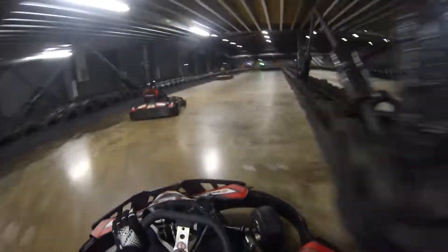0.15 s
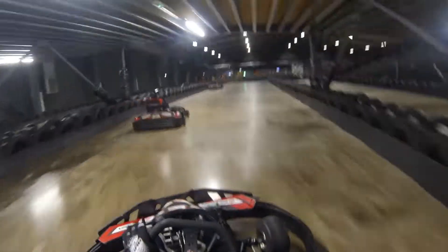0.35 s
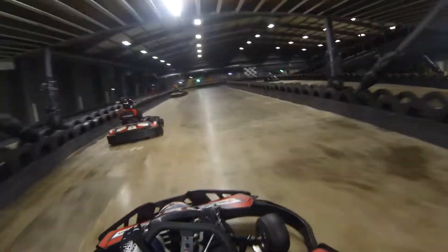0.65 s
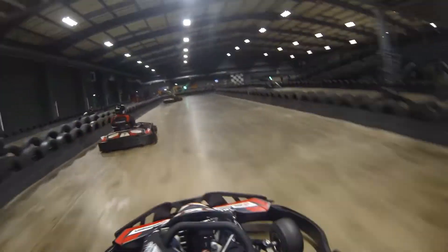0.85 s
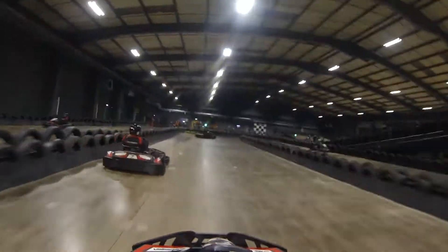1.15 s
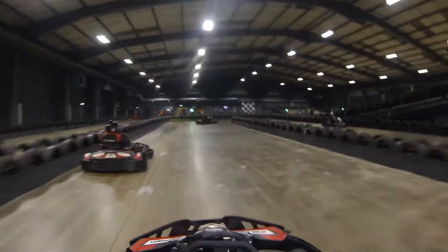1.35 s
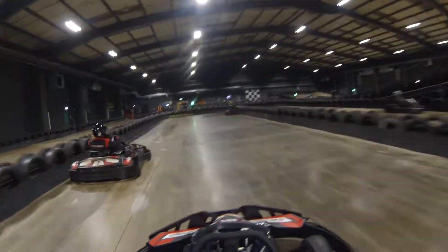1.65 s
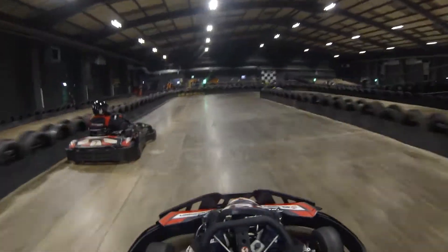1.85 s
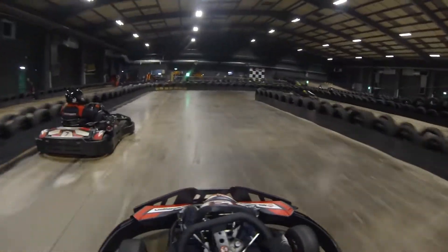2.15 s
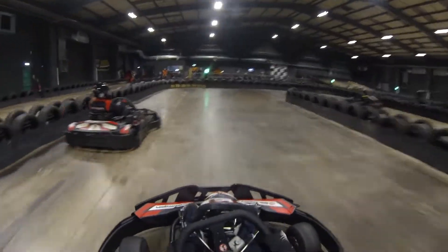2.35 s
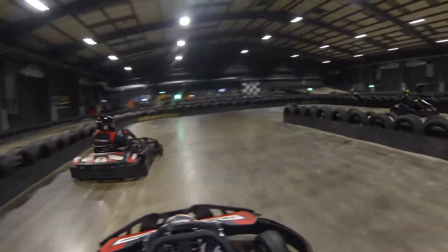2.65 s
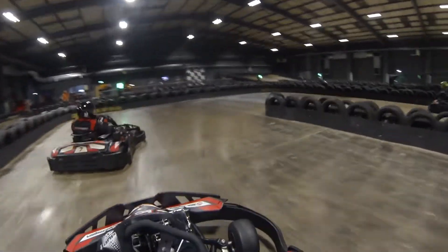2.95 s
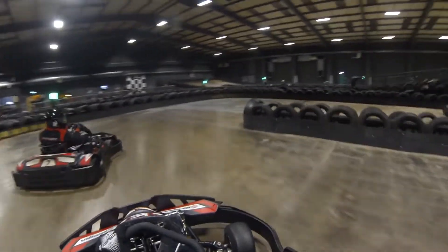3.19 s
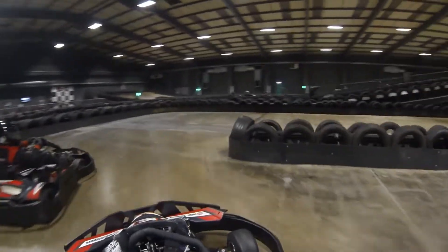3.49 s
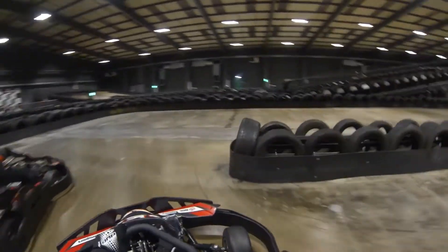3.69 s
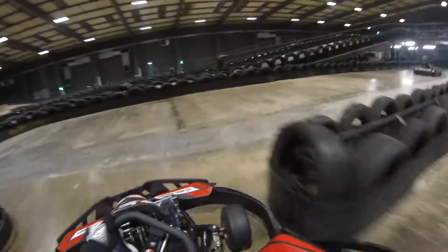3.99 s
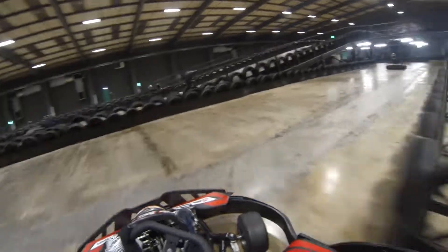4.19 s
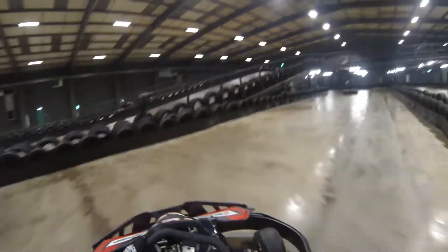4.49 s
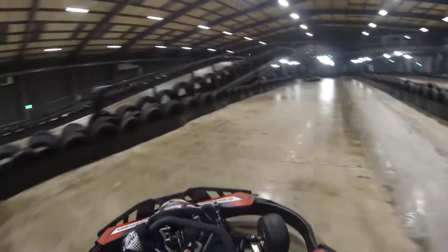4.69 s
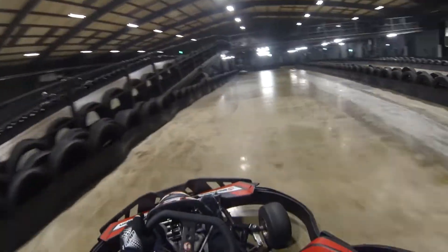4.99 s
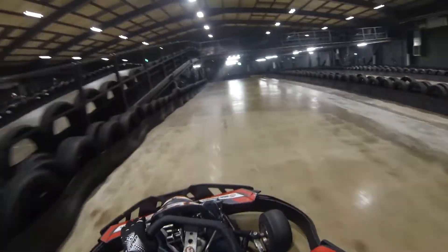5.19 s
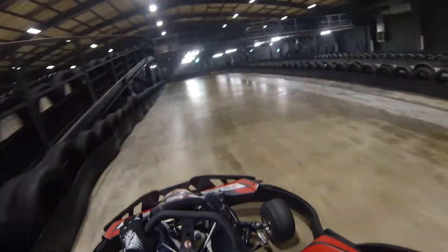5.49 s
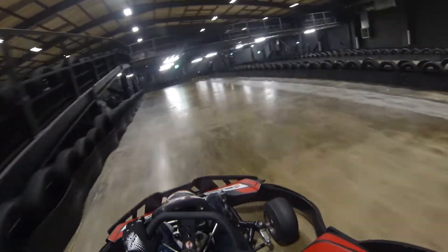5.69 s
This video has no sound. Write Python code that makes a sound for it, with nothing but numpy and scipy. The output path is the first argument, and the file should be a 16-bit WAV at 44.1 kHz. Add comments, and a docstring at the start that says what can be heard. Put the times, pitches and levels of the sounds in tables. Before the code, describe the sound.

A go-kart engine drones and throbs over a roaring hall, cuts with a thump, coasts, then pulls away amid frantic plasticky squeaks.

```python
"""A go-kart in an indoor hall; the microphone is in a sealed camera housing on the driver's helmet.
First the single-cylinder engine pulls, pulse by pulse, over noise for the roar of tyres and engines; a kart
passes alongside as faint wavering tones, and a loose plastic joint near the microphone squeaks by stick-slip.
The throttle shuts with a rasp, a decaying low swing thumps, and the kart coasts over a shuddering floor.
Then the throttle opens again, and the joint squeaks in quick succession as the kart pulls out of the bend."""
import sys
import numpy as np
from scipy import signal
from scipy.fft import rfft, irfft, next_fast_len
from scipy.io import wavfile
from scipy.ndimage import uniform_filter1d, map_coordinates

SR = 44100
rng = np.random.default_rng(int(sys.argv[2]) if len(sys.argv) > 2 else 0)


def file_out(sig):
    """Save sig as 16-bit WAV at sys.argv[1]."""
    # one column per channel
    cols = np.atleast_2d(sig).T
    # limit, then scale
    lim = np.clip(cols, -1, 1)
    pcm = np.round(lim * 32767).astype(np.int16)
    wavfile.write(sys.argv[1], SR, pcm)


def boost_factor(decibels):
    """Convert a level in decibels to a linear amplitude factor."""
    exponent = np.asarray(decibels, float) / 20
    return 10 ** exponent


N = 257544

# Driver's throttle. Each row: time in seconds, opening from 0 to 1.
THROTTLE = [(0, 1), (1.61, 1), (1.67, .35), (3.45, .3), (3.57, .9), (3.7, .8), (3.85, .55), (3.95, .85),
            (4.6, .97), (5.84, 1)]
# Engine speed. Each row: time in seconds, firings per second.
FIRING_RATE = [(0, 32.6), (.27, 32.1), (.68, 33.2), (.97, 32.6), (1.18, 33.4), (1.31, 33.5), (1.48, 34.2),
               (1.6, 34.3), (1.75, 31.9), (1.9, 29.3), (2.23, 25.8), (2.54, 24.5), (3.25, 22.7),
               (3.64, 22.6), (3.89, 21.8), (4.1, 22.8), (4.33, 24.4), (4.66, 24.4), (4.9, 24.6),
               (5.1, 24.6), (5.67, 25.1), (5.84, 25.8)]
# Exhaust path to the microphone. Each row: frequency in Hz, relative gain in dB.
EXHAUST_PATH = [(20, -18), (65, 0), (100, 2.5), (128, 4), (148, 4), (168, -4), (195, -5.5), (220, -0.5),
                (236, -14), (258, -12), (274, -2), (296, -5), (318, 1.5), (336, -1.5), (356, -10),
                (600, -28.5), (2000, -47), (5000, -120)]
# Exhaust drone smeared by the hall and other karts. Each row: frequency in Hz, relative level in dB per Hz.
DRONE_SPECTRUM = [(41, -33), (70, -4.5), (102, -6), (161, -3.5), (175, -8), (200, -0.5), (430, -14),
                  (666, -26), (800, -19), (1040, -48), (1760, -120)]
# Moments when the frame's shake swells (+) or slackens (-). Each row: time in seconds, change in dB.
SHAKE_SURGES = [(.78, -3), (1.0, -0.5), (1.3, -3.5), (1.44, 1), (3.6, 5), (4.5, 13.5)]
# Jolts through the frame. Each row: start in seconds, swing level in dB before a common lift,
# settled pitch in Hz, time to fall 60 dB in seconds, knock level in dB.
JOLTS = [(1.8016, -7.5, 41.8, 0.23, -23.5), (2.535, -18, 39.66, 0.26, -39), (2.944, -17, 41.74, 0.29, -35),
         (4.332, -15.5, 42.15, 0.31, -40)]
# Steady shudder of the frame. Each row: frequency in Hz, relative level in dB per Hz.
SHUDDER_SPECTRUM = [(8, 3), (16, -19.5), (22, 1), (32, -8), (45, -1), (60, -18.5), (90, -20), (200, -52),
                    (500, -120)]
# Rough (+) and smooth (-) patches of floor. Each row: time in seconds, change in dB.
FLOOR_PATCHES = [(1.72, 0), (2.15, 1.5), (2.45, 4.5), (2.6, 3.5), (2.75, -6), (3.15, -7), (3.63, 2),
                 (3.85, -8.5), (4, 4.5), (4.25, -13), (4.45, 3), (5.2, -2.5)]
# Looseness of the fittings, heard as chatter. Each row: time in seconds, level in dB before a common trim.
CHATTER = [(0, -44), (.3, -45.5), (.65, -40), (.84, -41), (.9, -43), (1.45, -48), (1.52, -38), (1.6, -52),
           (3.3, -62.5), (4.55, -47.5), (4.75, -49), (5.3, -43.5), (5.55, -56.5), (5.84, -41)]
# Short squeaky tones. Each row: nominal start in seconds, nominal length in seconds,
# level in dB before a common lift, middle pitch in Hz.
SQUEAKY_TONES = [(0.069, .019, -46, 5420), (0.376, .01, -50, 4610), (0.383, 0.057, -43, 5750),
                 (0.43, .012, -46, 4927), (0.512, 0.019, -44, 5200), (0.54, 0.024, -43, 5470),
                 (0.64, 0.01, -36, 4900), (0.658, 0.02, -33, 5255), (0.694, 0.011, -47, 4685),
                 (0.746, 0.032, -52, 5570), (0.784, 0.02, -49, 5300), (0.815, 0.014, -46, 4720),
                 (0.827, 0.0101, -36.5, 5685), (0.847, .015, -43, 5510), (0.912, 0.0304, -43, 5300),
                 (0.995, .012, -40, 5410), (1.178, .013, -42, 5310), (1.27, 0.012, -39, 5370),
                 (1.501, .01, -42, 4900), (3.452, 0.043, -39, 5600), (3.587, 0.031, -39, 5500),
                 (3.982, .023, -43.5, 6180), (4.106, 0.02, -37, 5176), (4.229, 0.0087, -40.5, 5680),
                 (4.24, .009, -41, 4900), (4.299, 0.018, -37, 5080), (4.317, 0.03, -39, 5940),
                 (4.374, 0.022, -44, 5510), (4.405, 0.047, -37.5, 5130), (4.461, 0.0069, -45, 6300),
                 (4.501, 0.02, -36, 4900)]
# Crowded squeaks out of the bend, rising and falling in level.
# Each row: time in seconds, level in dB before a common lift, pitch in Hz.
CROWDED_SQUEAKS = [(4.6, -62, 5300), (4.63, -44, 6200), (4.638, -50, 5000), (4.648, -37, 5810),
                   (4.675, -49, 5500), (4.69, -34, 4900), (4.702, -44, 5400), (4.714, -35, 5800),
                   (4.73, -42, 5110), (4.744, -57, 5000), (4.756, -40, 4945), (4.77, -40, 4690),
                   (4.782, -41, 5700), (4.8, -40, 5490), (4.812, -36, 4840), (4.836, -35.5, 4790),
                   (4.848, -46, 6000), (4.868, -56, 5630), (4.885, -39, 5000), (4.894, -38, 4340),
                   (4.902, -35, 5650), (4.922, -41, 5590), (4.934, -36, 4450), (4.955, -34, 4900),
                   (4.968, -39, 5970), (4.99, -41, 5850), (5.0, -36, 4860), (5.016, -37, 4800),
                   (5.028, -59, 4900), (5.038, -34, 5810), (5.056, -44, 5110), (5.075, -40, 4900),
                   (5.093, -33.5, 5650), (5.12, -48, 5600), (5.132, -48, 5210), (5.144, -37, 4440),
                   (5.158, -46, 5610), (5.178, -37, 4900), (5.198, -37, 4900), (5.222, -36, 5450),
                   (5.25, -42, 5480), (5.276, -45, 5030), (5.292, -39.5, 4700), (5.318, -31.5, 4800),
                   (5.335, -42, 5520), (5.352, -41, 5000), (5.362, -38, 4850), (5.372, -59, 4700),
                   (5.385, -33.5, 4410), (5.4, -47, 5300), (5.413, -38, 4550), (5.426, -45, 4604),
                   (5.446, -36.5, 4550), (5.468, -46, 5190), (5.486, -34.5, 4360), (5.508, -46, 4510),
                   (5.528, -53, 4705), (5.562, -46, 4300), (5.588, -53, 5800), (5.6, -30.5, 4400),
                   (5.615, -38, 4900), (5.632, -48, 4900), (5.646, -32.5, 4950), (5.662, -46, 4300),
                   (5.677, -31, 4300), (5.688, -34, 4980), (5.704, -58, 4800), (5.718, -26, 4750),
                   (5.73, -40, 4600), (5.752, -44, 4470), (5.764, -30, 4350), (5.782, -39, 4470),
                   (5.802, -29, 4950), (5.814, -39, 5540), (5.826, -36, 5080), (5.84, -30, 5200)]
# Housing resonances near the joint. Each row: frequency in Hz, width in Hz, relative gain in dB.
HOUSING_MODES = [(4232, 127, 3.5), (4900, 214, -0.5), (5620, 316, -1), (9720, 780, 8), (11800, 900, -1)]
# Dry rubbing of the joint. Each row: frequency in Hz, relative level in dB per Hz.
RUBBING_SPECTRUM = [(2500, -78), (4200, 4), (6000, 7), (7200, -2), (8600, -13), (10000, -22), (12300, -7.5),
                    (13500, -18), (14800, -26), (16000, -90)]
# Rasp as the throttle shuts: start in seconds, level of its lowest tone in dB, pitch in Hz.
TICK = (1.6497, -27, 3200)
# Panel resonances. Each row: frequency in Hz, width in Hz, relative gain in dB.
PANEL_MODES = [(1837, 44, 4.5), (2690, 64, -3.5), (3200, 140, -9.5)]
# Swells of the panel buzz. Each row: time in seconds, rise in dB.
BUZZ_SWELLS = [(.5, 5.3), (1.55, 3.2)]
# Short tonal pings of a panel. Each row: start in seconds, peak level in dB, pitch in Hz.
PINGS = [(.425, -36, 3130), (0.441, -31, 2650), (.518, -32, 2770), (.536, -27, 3070), (.575, -26, 3130)]
# Roar of the hall round the kart. Each row: time in seconds, level in dB.
ROAR_LEVEL = [(0, -32.5), (.6, -31.5), (1.7, -33), (2.2, -34.5), (3, -35.5), (4.2, -35), (5.84, -33.5)]
# Colour of that roar. Each row: frequency in Hz, relative level in dB per Hz.
ROAR_SPECTRUM = [(290, -8), (500, -9.5), (544, -9.5), (623, -9), (670, -7.5), (844, -7), (1070, 2),
                 (1300, -0.5), (1500, -2.5), (2010, -1), (2460, -13.5), (3130, -7), (3660, -16),
                 (4900, -21), (6110, -36.5), (7940, -50), (13400, -120)]
# Colour of the hiss above it. Each row: frequency in Hz, relative level in dB per Hz.
HISS_SPECTRUM = [(4000, -5.5), (6000, -5.5), (7500, -9.5), (8800, -10.5), (10000, -14.5), (12000, -17),
                 (13500, -21), (15000, -45), (16000, -90)]
# Kart alongside. Each row: time in seconds, firings per second, level of its sixth order in dB.
NEIGHBOUR = [(0, 33, -57), (.15, 34.6, -46), (.28, 31.6, -34.5), (.42, 33, -43.5), (2, 29.3, -64),
             (2.5, 31.7, -48.5), (3.3, 36, -50), (3.7, 28, -70)]
# Brief dips of everything but the frame. Each row: time in seconds, depth in dB.
DIPS = [(.345, 3.5), (.73, 5.5), (1.845, 8.5)]

FRAME_HZ = 32.8  # firing rate at which the frame shakes most


def unit(x):
    """x scaled to an rms of 1."""
    return x / np.sqrt(np.mean(x ** 2) + 1e-20)


def along(points, hz):
    """Values at hz from (Hz, value) points on a log axis."""
    f, value = np.transpose(points)
    return np.interp(np.log(hz + 1), np.log(f + 1), value)


def curves(rows):
    """One value per sample for each column after the time."""
    s, *columns = np.transpose(rows)
    return [np.interp(np.arange(N) / SR, s, column) for column in columns]


def wobble(rate):
    """A smooth random curve, rate knots a second."""
    knots = rng.standard_normal(int(N * rate / SR) + 4)
    return map_coordinates(knots, [np.arange(N) * rate / SR])


def humps(rows, half_s):
    """Bell-shaped humps in dB from (s, dB) rows, down to 1/e at half_s from the middle."""
    t = np.arange(N) / SR
    return sum(db * np.exp(-((t - s) / half_s) ** 2) for s, db in rows)


def filtered(x, response):
    """x filtered by a complex response of frequency."""
    m = 2 * next_fast_len(N // 2 + SR // 2)
    return irfft(rfft(x, m) * response(np.fft.rfftfreq(m, 1 / SR)), m)[:N]


def causal(spectrum):
    """The minimum-phase response with the gain of a spectrum."""
    def response(hz):
        cepstrum = irfft(np.log(boost_factor(along(spectrum, hz))))
        cepstrum[1:len(hz) - 1] *= 2
        cepstrum[len(hz):] = 0
        return np.exp(rfft(cepstrum))
    return response


def resonances(modes):
    """A causal response summed from resonant peaks of alternating sign."""
    def response(hz):
        total = 0
        for k, (centre, width, db) in enumerate(modes):
            peak = 1j * hz * width / (centre * centre - hz * hz + 1j * hz * width)
            total = total + (-1) ** k * boost_factor(db) * peak
        return total
    return response


def rush(spectrum, patchy_db):
    """Coloured noise of rms 1 with patches of random gain in time and frequency."""
    z = signal.stft(rng.standard_normal(N), nperseg=512)[2]
    field = uniform_filter1d(rng.standard_normal(z.shape), size=4, axis=0)
    field = uniform_filter1d(field, size=10, axis=1)
    x = signal.istft(z * boost_factor(patchy_db * unit(field)), nperseg=512)[1][:N]
    return unit(filtered(x, lambda hz: boost_factor(along(spectrum, hz))))


def looseness():
    """The chatter level in dB above -50 dB, slowly followed."""
    return uniform_filter1d(curves(CHATTER)[0], size=9000) + 50


def firing_turns():
    """Running count of firings, with a slight unsteadiness of the engine speed."""
    rate, = curves(FIRING_RATE)
    return np.cumsum(rate * (1 + 0.0019 * wobble(6))) / SR


def exhaust(turns):
    """One pulse per firing rings the exhaust path; a noisy drone is what the hall and other karts smear."""
    level_db, waver_db = -38, -0.5
    labour_db_per_hz = 0.233  # under throttle it grows as the rate falls below the frame's resonance
    silencer_s_per_hz = 2.5e-5  # the silencer lets higher orders out later
    coast_hz, coast_db = 258, -13  # off throttle the drone loses this much above this pitch
    rate, = curves(FIRING_RATE)
    throttle, = curves(THROTTLE)
    fired = np.flatnonzero(np.diff(np.floor(turns)))
    pulses = np.zeros(N)
    pulses[fired] = boost_factor(0.55 * rng.standard_normal(len(fired)))  # no two charges burn alike
    piped = filtered(pulses, causal(EXHAUST_PATH))
    delayed = filtered(piped, lambda hz: np.exp(-1j * np.pi * silencer_s_per_hz * hz ** 2))
    beat = throttle * unit(delayed)
    drone = (0.85 - 0.4 * throttle) * rush(DRONE_SPECTRUM, patchy_db=1.5)
    coast_loss = filtered(drone, lambda hz: boost_factor(coast_db / (1 + (coast_hz / (hz + 1)) ** 6)) - 1)
    drone = drone + (1 - throttle) * coast_loss
    labour_db = labour_db_per_hz * throttle ** 3 * (FRAME_HZ - rate)
    return boost_factor(level_db + labour_db + waver_db * wobble(3.71)) * (beat + drone)


def shake(turns):
    """Firings drive the frame near its resonance; the crank at twice their rate drives a second one."""
    frame_db, frame_waver_db, frame_width_hz = -17, 3, 4.3
    seat_db, seat_waver_db, seat_hz, seat_width_hz = -31, 3.1, 44.9, 9.6
    rate, = curves(FIRING_RATE)
    throttle, = curves(THROTTLE)
    frame_level = boost_factor(frame_db + humps(SHAKE_SURGES, 0.057) + frame_waver_db * wobble(9.5))
    frame_level = frame_level / np.hypot(1, 2 * (rate - FRAME_HZ) / frame_width_hz)
    swing = np.sin(2 * np.pi * turns + 1.77) + 0.073 * np.sin(4 * np.pi * turns + 2.0)
    frame = np.sqrt(2) * frame_level * swing
    seat = boost_factor(seat_db + seat_waver_db * wobble(6)) * np.sin(4 * np.pi * turns)
    seat = seat / np.hypot(1, 2 * (2 * rate - seat_hz) / seat_width_hz)
    return throttle ** 3 * frame + np.sqrt(throttle) * seat


def jolts():
    """Each bump sets the hard-bent frame swinging, faster at first, with a short knock of the seat."""
    out, t = np.zeros(N + SR), np.arange(SR // 2) / SR
    stiff_s = 0.0027  # time gained by the faster first swings
    swing_t = t + stiff_s * (1 - np.exp(-t / 0.0091))
    onset = 1 - np.exp(-t / 0.0026)
    for s, db, hz, t60, knock_db in JOLTS:
        swing = -np.sin(2 * np.pi * hz * swing_t) * onset
        knock = boost_factor(knock_db - 60 * t / 0.041) * np.sin(2 * np.pi * 270 * t)
        out[round(s * SR):][:len(t)] += boost_factor(db + 2.0 - 60 * t / t60) * swing - knock
    return out[:N]


def shudder():
    """The floor shakes the frame as low noise, more over rough patches."""
    return boost_factor(-25.5 + humps(FLOOR_PATCHES, 0.05)) * rush(SHUDDER_SPECTRUM, patchy_db=1.5)


def joint_press(turns):
    """Level and slip rate: chatter kicked by each firing, short squeaky tones, then crowded squeaks."""
    rise_hz_per_s = 28000  # the pitch rises through each short tone
    t = np.arange(N) / SR
    start, length, db, hz = np.transpose(SQUEAKY_TONES)
    half_rise = rise_hz_per_s * length / 2
    glide_s = np.ravel([start, start + length], "F")
    glide_hz = np.ravel([hz - half_rise, hz + half_rise], "F")
    slip_hz = np.interp(t, glide_s, glide_hz)
    press = boost_factor(curves(CHATTER)[0] - 5)
    press = press * boost_factor(2.5 * wobble(70) + 4 * np.sin(-2 * np.pi * turns))
    for s, span, level in zip(start, length, db):
        # each tone starts a little early and outlasts its nominal length
        u = np.linspace(0, 1, round(1.57 * span * SR))
        at = round((s - 0.2 * span) * SR)
        swell = np.sin(np.pi * u ** 0.75) ** 1.5  # grips fast, lets go slowly
        press[at:at + len(u)] += boost_factor(level + 1.5) * swell
    crowded_db, crowded_hz = curves(CROWDED_SQUEAKS)
    crowded = t > CROWDED_SQUEAKS[0][0]
    press = np.where(crowded, boost_factor(crowded_db + 2.5), press)
    return press, np.where(crowded, crowded_hz, slip_hz)


def joint(turns):
    """Stick-slip at a few thousand slips a second: rough tones, an octave and grit ring the housing."""
    press, slip_hz = joint_press(turns)
    rough = 1 + 0.015 * wobble(90) + 0.035 * wobble(300) + 0.022 * wobble(2500)
    phase = 2 * np.pi * np.cumsum(slip_hz * rough) / SR
    # another contact slips at its own rate
    second_rough = 1 + 0.08 * wobble(110) + 0.025 * wobble(1500)
    second_phase = 2 * np.pi * np.cumsum(slip_hz * second_rough) / SR
    second = boost_factor(-4.5 + 3.3 * wobble(120)) * np.sin(second_phase)
    harsh_db = 0.76 * (looseness() - 9)  # a looser joint squeaks harsher
    octave = boost_factor(-18 + harsh_db + 1.5 * wobble(22.7)) * np.sin(2 * phase)
    # irregular slips ring the lower housing resonances at once, against the tone
    scrape = rush(RUBBING_SPECTRUM, patchy_db=4)
    grit = boost_factor(-9) * filtered(scrape, lambda hz: 1 / (1 + (hz / 7000) ** 8))
    slips = press * boost_factor(2.9 * wobble(600)) * (np.sin(phase) + second + grit + octave)
    # the rubbing is spread out round each squeak
    rubbing = uniform_filter1d(press, size=1000) * boost_factor(-16 + harsh_db + 5.1 * wobble(120))
    rubbing = rubbing * rush(RUBBING_SPECTRUM, patchy_db=-1.5)
    return 1.04 * filtered(slips, resonances(HOUSING_MODES)) + rubbing


def tick():
    """A few sharp slips in a row as the throttle shuts: a short tone with overtones."""
    length_s, fall_db = 0.003, 9  # fall: loss per overtone
    s, db, hz = TICK
    out, t = np.zeros(N), np.arange(round(length_s * SR)) / SR
    rasp = sum(boost_factor(db - fall_db * k) * np.sin(2 * np.pi * (k + 1) * hz * t) for k in range(4))
    out[round(s * SR):][:len(t)] = np.sqrt(np.sin(np.pi * t / length_s)) * rasp
    return out


def buzz():
    """Clumps of tiny contacts ring the panels while the engine pulls at high speed."""
    level_db, follows, from_hz = -43, 0.32, 28.3  # follows: dB per dB of looseness; from_hz: firing rate
    contacts = rng.standard_normal(N) * boost_factor(3 * wobble(45) + 2 * wobble(300))
    pulling = curves(THROTTLE)[0] * np.clip(curves(FIRING_RATE)[0] - from_hz, 0, 1)
    panel = resonances(PANEL_MODES)
    ring = unit(filtered(contacts, lambda hz: panel(hz) / (1 + (hz / 3900) ** 8)))
    return boost_factor(level_db + follows * looseness() + humps(BUZZ_SWELLS, 0.29)) * pulling * ring


def pings():
    """A panel sings for a moment: a short tone that swells and fades."""
    length_s = 0.0096
    out, t = np.zeros(N), np.arange(round(length_s * SR)) / SR
    for s, db, hz in PINGS:
        swell = np.sin(np.pi * t / length_s)
        out[round(s * SR):][:len(t)] += boost_factor(db) * swell * np.sin(2 * np.pi * hz * t)
    return out


def road(turns):
    """The roar and hiss of tyres and engines as noise, throbbing with each firing."""
    roar_db, = curves(ROAR_LEVEL)
    hiss_db = -55.5 + 0.54 * looseness()
    throttle, = curves(THROTTLE)
    throb = 1 + 0.12 * throttle * np.cos(2 * np.pi * turns) + 0.02 * np.cos(4 * np.pi * turns)
    roar = boost_factor(roar_db + 0.55 * wobble(9)) * throb * rush(ROAR_SPECTRUM, patchy_db=0.93)
    hiss = boost_factor(hiss_db) * throb * rush(HISS_SPECTRUM, patchy_db=1.2)
    return roar + hiss


def neighbour():
    """Of the kart alongside, only the orders near its exhaust resonance stand out, unsteady."""
    rate, db = curves(NEIGHBOUR)
    phase = 2 * np.pi * np.cumsum(rate * (1 + 0.0074 * wobble(9.8))) / SR
    out = np.zeros(N)
    for order in (6, 7):
        out += boost_factor(db - 7 * (order - 6) + 2 * wobble(7)) * np.sin(order * phase)
    return out


def scene():
    """The frame's low motion, plus everything carried by air and housing."""
    turns = firing_turns()
    frame = shake(turns) + shudder() + jolts()
    carried = exhaust(turns) + road(turns) + joint(turns) + buzz() + pings() + tick() + neighbour()
    dip = boost_factor(-humps(DIPS, 0.026))
    return (frame + dip * carried)[None]


def low_pass(x):
    """Removes everything above the highest recorded frequency."""
    return signal.sosfilt(signal.butter(12, 15100, fs=SR, output="sos"), x)


def record(dry):
    """The finished mix as the camera keeps it."""
    return low_pass(dry)


dry = scene()
out = record(dry)
file_out(out)
```